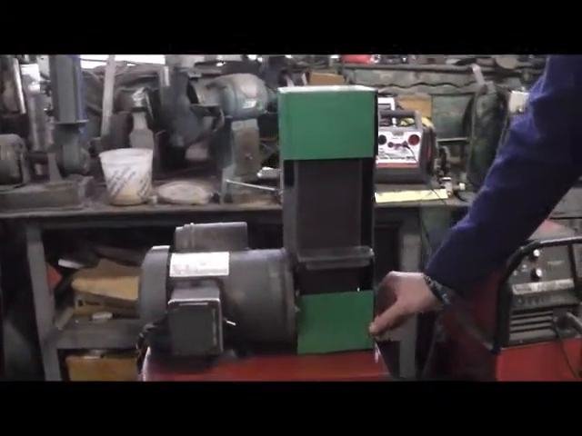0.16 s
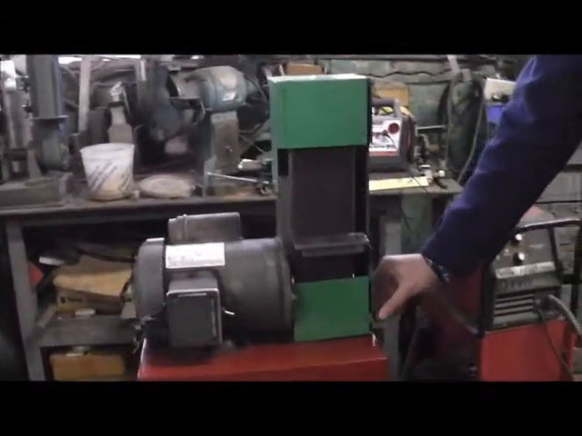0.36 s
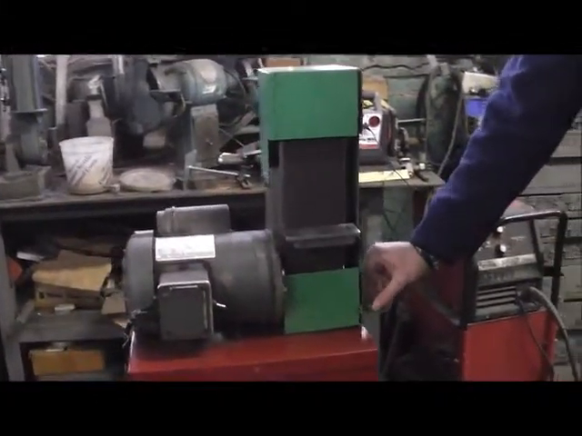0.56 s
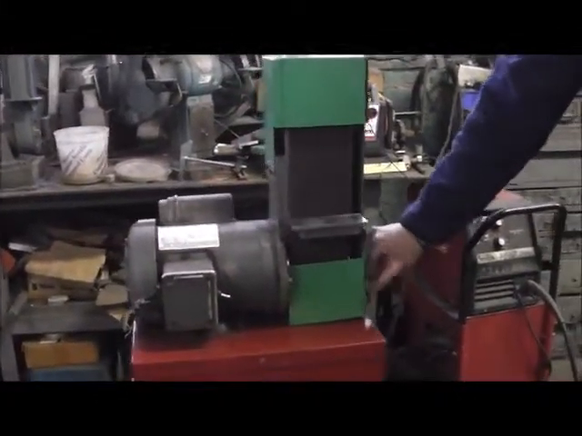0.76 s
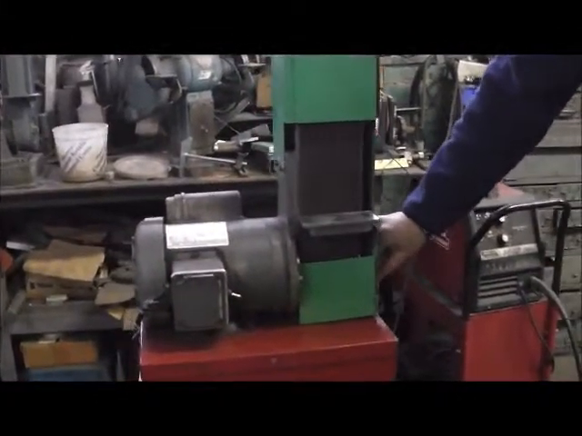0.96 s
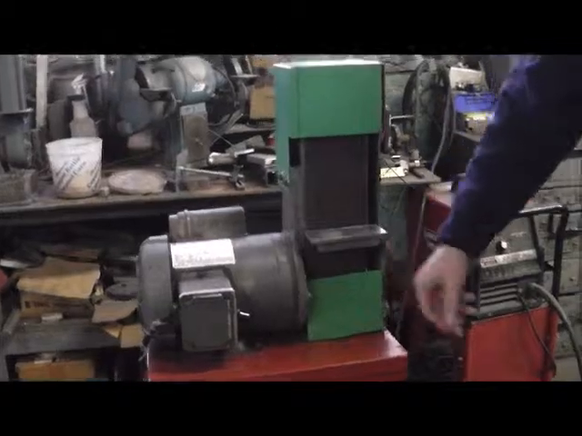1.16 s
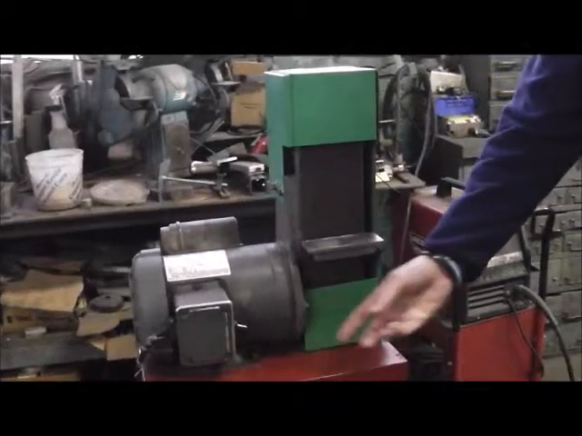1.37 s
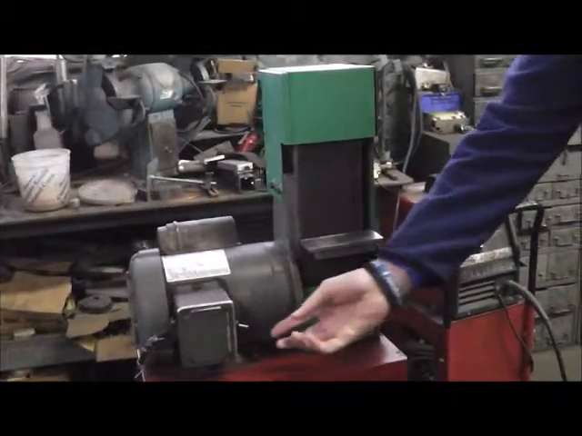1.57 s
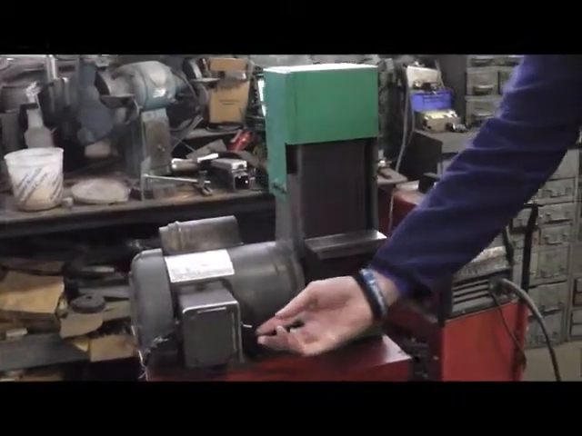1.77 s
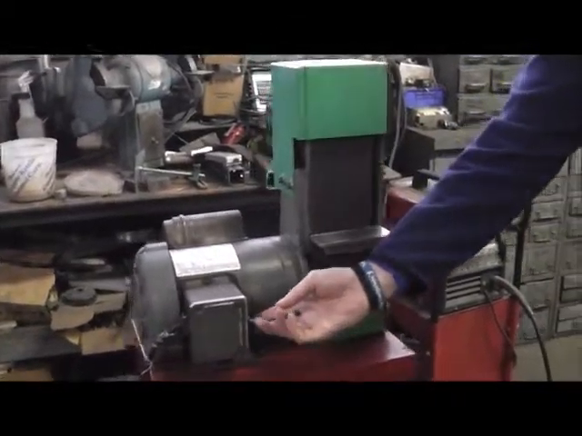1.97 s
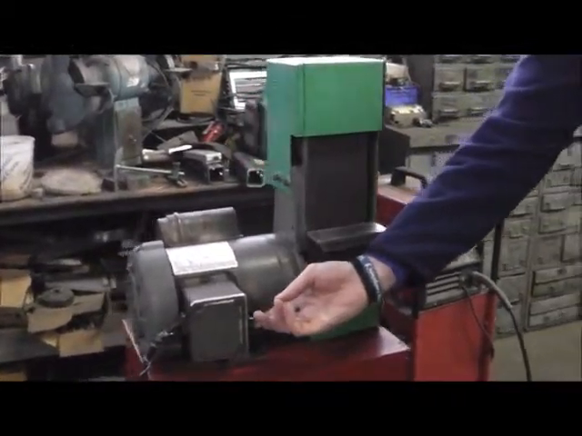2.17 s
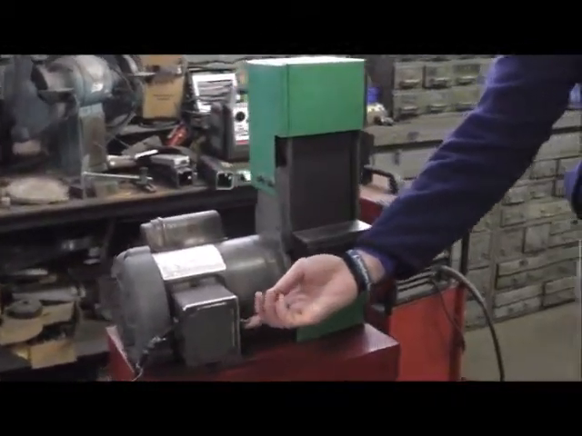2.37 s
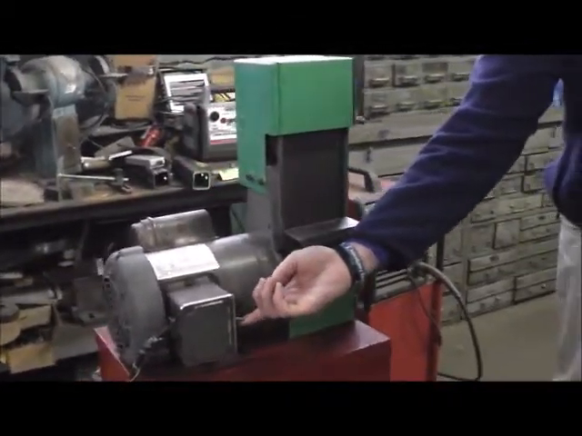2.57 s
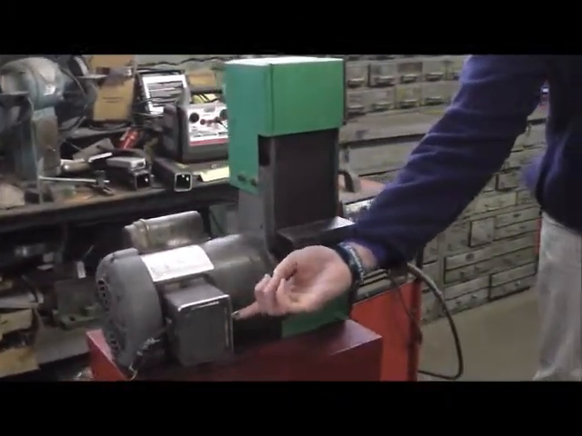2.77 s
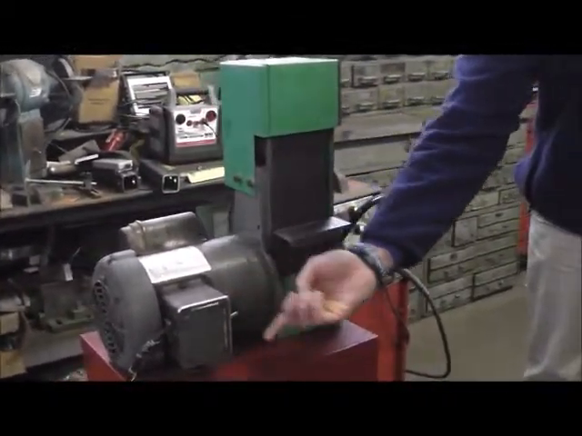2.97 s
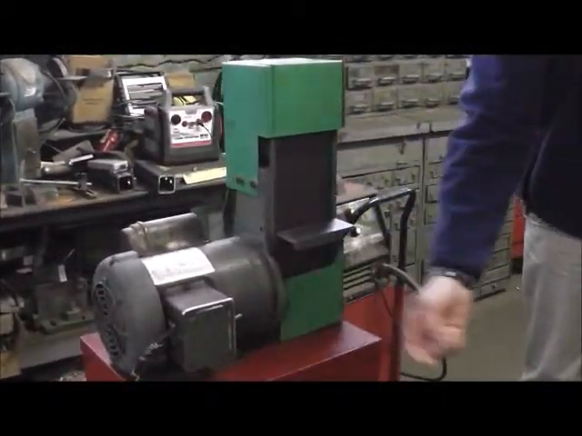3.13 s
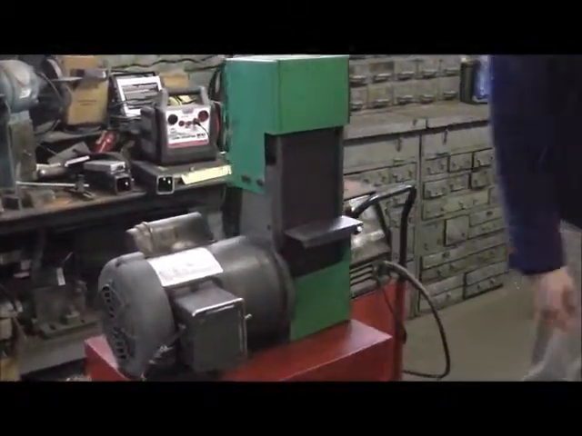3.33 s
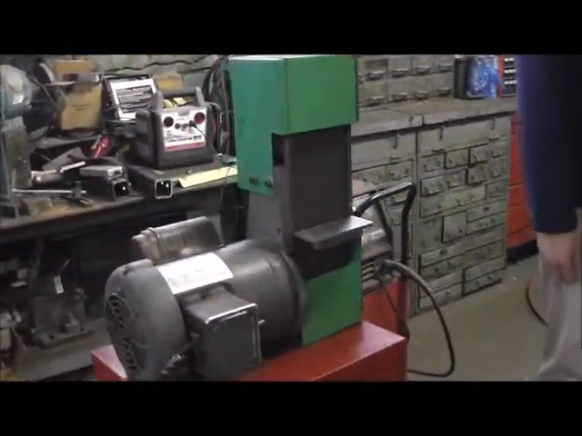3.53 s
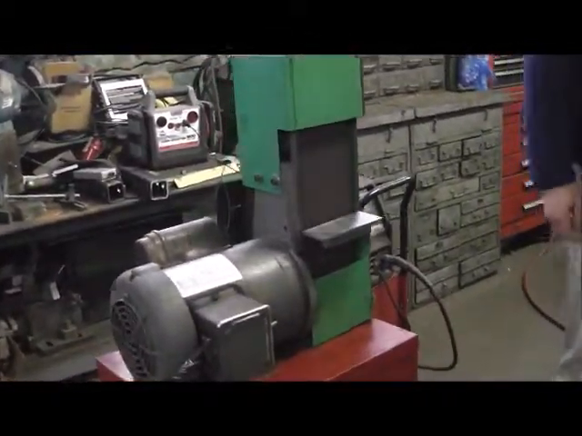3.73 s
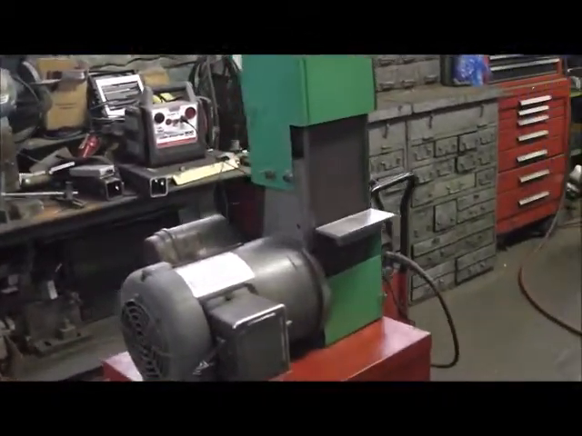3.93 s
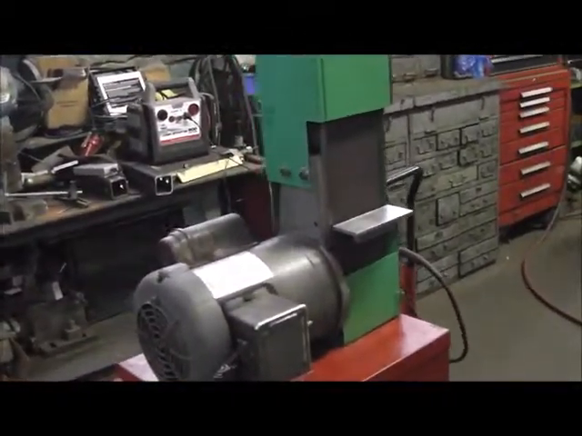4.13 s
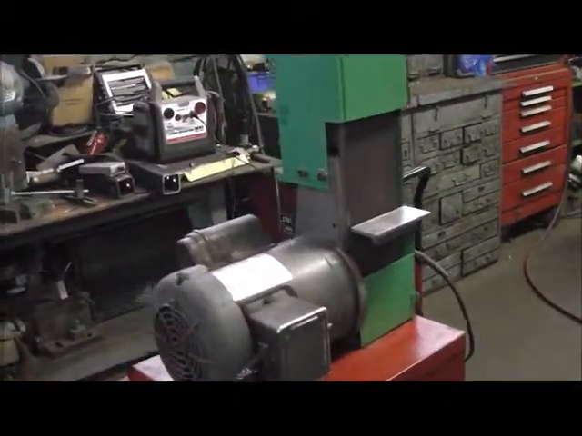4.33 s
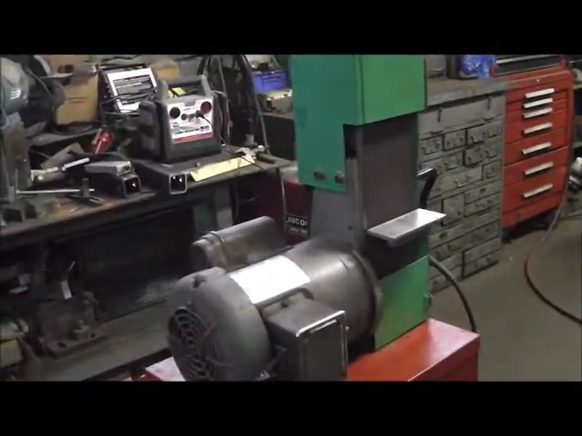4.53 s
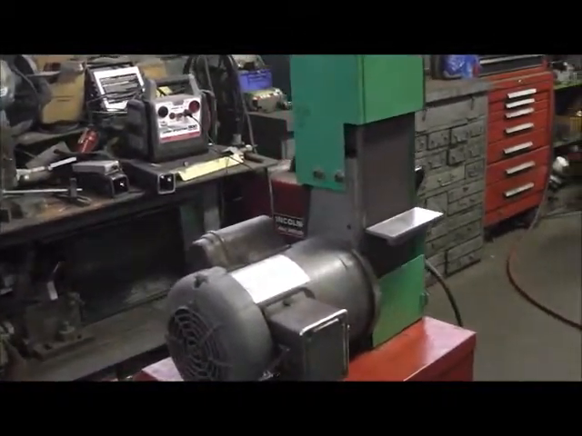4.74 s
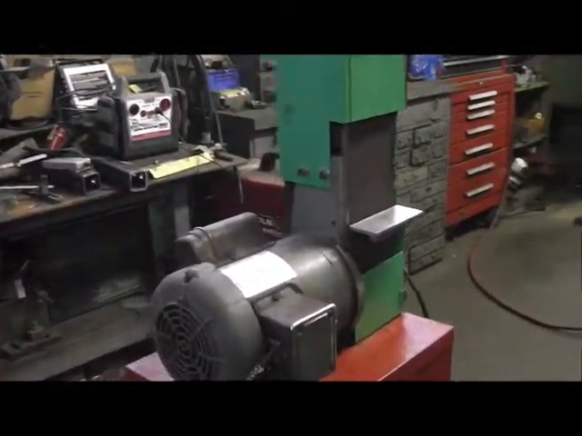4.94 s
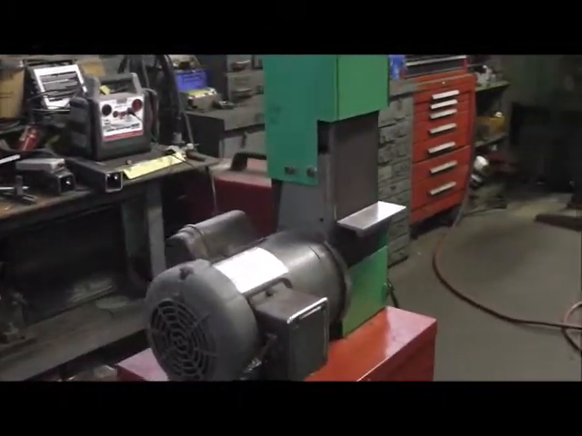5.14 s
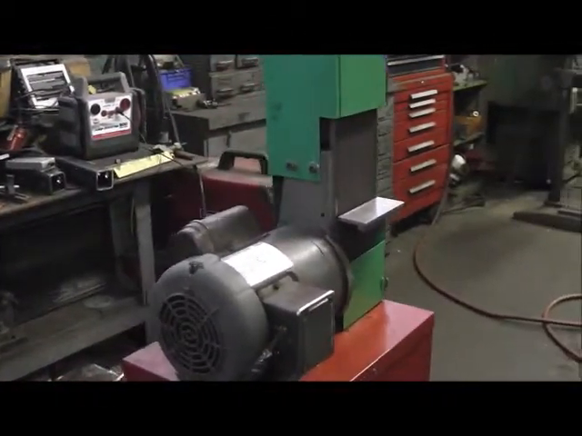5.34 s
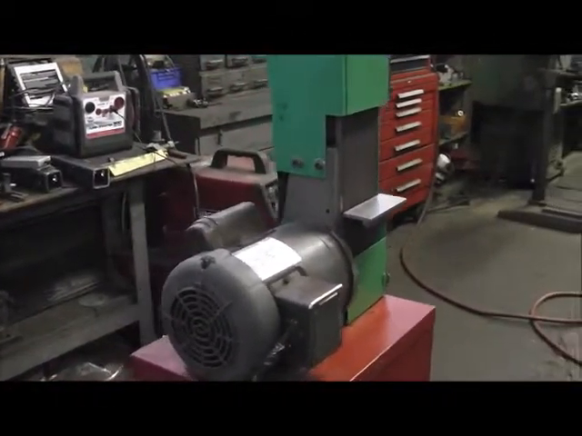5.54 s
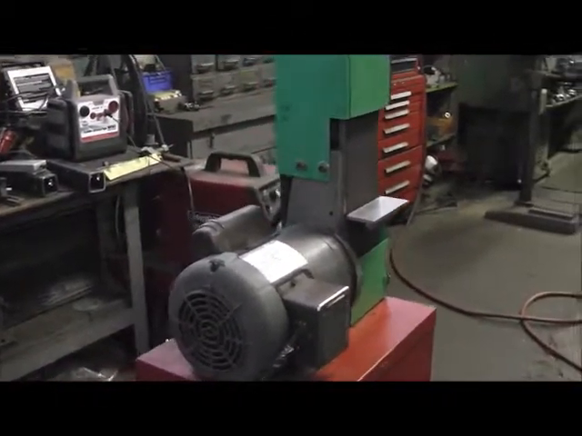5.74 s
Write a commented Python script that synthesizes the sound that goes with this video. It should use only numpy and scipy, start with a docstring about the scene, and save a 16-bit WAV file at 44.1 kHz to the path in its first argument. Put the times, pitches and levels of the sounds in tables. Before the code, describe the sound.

Metal clanks and light taps in a workshop, then a toggle switch snaps and a belt sander growls up to a loud, steady, roaring whine.

```python
"""In a machine shop, a bench belt sander starts up close to a hand-held camera. Metal parts clank, light taps
sound and feet scuff over a low rumble made of coloured noise, then a toggle switch snaps: bursts and rings.
The motor growls up to speed in about half a second and runs on with a humming shaft and a whining fan, all tones.
The belt is noise that partly repeats every lap: it roars over the rollers and hisses along the platen.
The camera's limiter turns everything down under the loudest sounds."""
import sys
import numpy as np
from scipy import signal
from scipy.fft import rfft, irfft, next_fast_len
from scipy.io import wavfile
from scipy.ndimage import uniform_filter1d, minimum_filter1d, map_coordinates

SR = 44100
rng = np.random.default_rng(int(sys.argv[2]) if len(sys.argv) > 2 else 0)


def wav_record(signal):
    """Record a signal, one row per channel, as 16-bit PCM in the file named by sys.argv[1]."""
    frames = np.transpose(np.atleast_2d(signal))
    bounded = np.clip(frames, -1, 1)
    # unit amplitude maps onto the largest positive 16-bit level
    quanta = np.round(bounded * 32767).astype(np.int16)
    wavfile.write(sys.argv[1], SR, quanta)


N = 255780
TIME = np.arange(N) / SR  # seconds

# Noise colours are scaled to rms 1 after shaping, so their levels only count relative to each other.
# Low rumble of the shop. Each row: frequency in Hz, level in dB.
RUMBLE_COLOUR = [(11, -30.5), (18, 0), (75, 1.5), (110, -5.5), (140, -12), (240, -120)]
# Handling of the camera. Each row: frequency in Hz, level in dB.
HANDLING_COLOUR = [(50, -34), (90, -6), (180, 1), (270, -5.5), (350, -14), (520, -37), (900, -76)]
# Steady moving air. Each row: frequency in Hz, level in dB.
AIR_COLOUR = [(150, 2), (350, 2), (650, 1.5), (1000, -5), (1500, -8.5), (2000, -16), (2700, -31),
              (3400, -30.5), (4500, -27.5), (7000, -32.5), (11000, -34), (15500, -43)]
# Scuffing shoes and sleeve. Each row: frequency in Hz, level in dB.
SCUFF_COLOUR = [(1800, 0), (3000, -16.5), (4200, -10.5), (5500, -3.5), (8500, -3), (11000, -6),
                (13000, -13.5), (16000, -15)]
# How the handling changes. Each row: time in seconds, rumble level in dB, rubbing level in dB.
HANDLING_LEVELS = [(0, -30, -40.5), (1.0, -31.5, -35.5), (1.85, -31, -28), (2.5, -26, -29),
                   (2.8, -34, -33.5), (3.6, -37, -39)]
# Scuffs. Each row: time of the peak in seconds, level in dB, rise by 60 dB in seconds, fall by 60 dB in seconds.
SCUFFS = [(.607, -45.5, 0.04, 0.34), (.7, -39, 0.78, .2), (1.61, -44, 0.25, 0.71), (2.035, -46, 0.03, .5),
          (2.087, -29.5, 0.0121, 0.13), (2.11, -38.5, 0.19, 0.47), (2.452, -48, 0.1, 0.43)]
# Colour of the echo, rich in the low middle. Each row: frequency in Hz, level in dB.
ECHO_COLOUR = [(100, -3), (320, 15.5), (450, -1), (680, 8), (1300, 2), (2500, 3), (8000, -1.5), (16000, -5)]
# How long the echo lasts. Each row: frequency in Hz, time to fall by 60 dB in seconds.
ECHO_DECAY = [(150, 0.72), (600, 0.865), (2000, 0.81), (5000, 0.794), (10000, 0.606), (16000, 0.3)]
# Stereo width of sounds from in front. Each row: frequency in Hz, side over middle in dB.
FRONT_WIDTH = [(30, -0.5), (200, -19.5), (2000, -26), (4000, -45.5), (7000, -13.5), (10000, -22),
               (12000, -1), (16000, -11)]
# Stereo width of sounds from all around. Each row: frequency in Hz, side over middle in dB.
AROUND_WIDTH = [(30, -15.5), (200, -22), (400, -18.5), (700, -16.5), (1300, -11), (2400, -12), (4400, -7.5),
                (8000, -7), (12000, -3), (16000, -1)]
# Light, dry taps. Each row: start in seconds, level in dB.
TAPS = [(1.502, -16.5), (1.5972, -14.5), (1.607, -24.5)]
# Colour of the taps and of the switch's knock. Each row: frequency in Hz, level in dB.
TAP_COLOUR = [(200, 3), (900, 5), (1500, 11.5), (2100, -5), (2800, -24.5), (4500, -21), (8000, -34.5),
              (15000, -36)]
# Metal contacts. Each row: start in seconds, bright clash level in dB, dull knock level in dB,
# steel ring level in dB, time for the clash to fall by 60 dB in seconds.
CLANKS = [(.1168, -9, -24.5, -15, 0.0853), (.133, -31, -19.5, -28.5, .06), (.413, -25, -23, -32.5, 0.0505),
          (.699, -48, -28, -59.5, .08), (0.8775, -43.5, -32, -58.5, 0.076),
          (.894, -5.5, -15.5, -28.5, 0.054), (.899, -8, -16.5, -24, 0.053),
          (.909, -12, -12.5, -43.5, 0.033), (.914, -4.5, -12, -36.5, 0.026),
          (1.026, -25.5, -50.5, -64, .04)]
# Colour of a bright clash and of the switch's crack. Each row: frequency in Hz, level in dB.
CLASH_COLOUR = [(300, -17), (2000, -23.5), (3000, -16), (4500, -6), (7000, -0.5), (10500, 5.5), (13000, -3),
                (16000, -15.5)]
# Colour of a dull knock. Each row: frequency in Hz, level in dB.
KNOCK_COLOUR = [(100, -24), (320, -0.5), (400, -6.5), (510, -1), (680, -0.5), (1000, -9), (1300, -1.5),
                (2000, -10.5), (2700, -29.5), (4500, -15.5), (8000, -30.5)]
# Ringing tones of the steel. Each row: frequency in Hz, typical level in dB, time to fall by 60 dB in seconds.
STEEL_TONES = [(832, -10, 0.248), (1280, -7.5, 0.104), (1762, -12, 0.145), (1993, -7.5, 0.0575),
               (4960, -4.5, 0.047), (5010, -2.5, 0.051), (5200, -7.5, 0.048), (9500, -14, .07),
               (10330, -21, .08)]
# The toggle snaps over, then its contacts close. Each row: start in seconds, level in dB.
SNAPS = [(2.7856, -9), (2.7877, -3)]
# Ringing tones of the switch box. Each row: frequency in Hz, typical level in dB, time to fall by 60 dB in seconds.
SWITCH_BOX_TONES = [(1420, -4, 0.025), (1570, -11.5, 0.0206), (2047, -4, 0.027), (2250, -6.5, 0.029),
                    (8970, -14, 0.0123), (9130, 1, 0.012), (14350, -1, 0.0094)]
# Tones of the frame during the start. Each row: frequency in Hz, level in dB relative to the growl.
GROWL_TONES = [(255, -2.5), (520, 1), (770, -12), (1250, -13)]
# Tones of the turning shaft. Each row: cycles per turn, typical level in dB before SANDER_DB.
SHAFT_TONES = [(1, -43.5), (3, -44), (9, -43.5), (10, -39.5)]
# Standing waves of the hum. Each row: time in seconds, level of the 2-per-turn tone in dB,
# shared level of the 4- and 5-per-turn tones in dB (before their own gains, the wobble and SANDER_DB).
HUM_LEVELS = [(3.25, -42.5, -34), (3.41, -27, -33.5), (3.67, -48.5, -35), (4.26, -29.5, -24),
              (4.65, -44.5, -26.5), (4.71, -39.5, -23.5), (5.3, -48.5, -36.5), (5.64, -27.5, -23),
              (5.8, -32, -24)]
# Standing waves of the fan, as the camera moves through them. Each row: time in seconds,
# blade tone level in dB, level of its octave in dB (before the flutter, the speed, the octave's gain and SANDER_DB).
FAN_LEVELS = [(3.26, -17, -19), (3.34, -17, -16.5), (3.95, -21, -16.5), (3.97, -17.5, -16.5),
              (4.39, -21.5, -18.5), (4.43, -15, -18.5), (4.49, -23.5, -18.5), (4.66, -18.5, -18.5),
              (4.76, -23, -21), (4.88, -20, -20.5), (5.41, -21, -18), (5.8, -16.5, -20.5)]
# The camera moves round the belt. Each row: time in seconds, change of level in dB.
BELT_NEARNESS = [(3.1, 1.94), (3.5, -0.13), (4.0, 0.78), (4.5, -2), (5.0, -2), (5.45, -0.16), (5.8, 0.05)]
# Colour of the rollers' roar. Each row: frequency in Hz, level in dB.
ROAR_COLOUR = [(30, -26.5), (150, -15), (260, -3.5), (370, -6.5), (480, -0.5), (720, 1.5), (900, -2),
               (1250, -1.5), (1550, -2.5), (1950, -5), (2250, -15), (2600, -21), (3300, -39.5), (5000, -68)]
# Colour of the platen's hiss. Each row: frequency in Hz, level in dB.
HISS_COLOUR = [(1650, -58.5), (2800, -9.5), (3240, -12.5), (3720, -9), (4060, -3.5), (6020, -5), (7390, -1),
               (10600, 1.5), (11200, -1), (13100, -9.5), (15200, -14), (16000, -13.5)]
# Difference between the two microphones. Each row: frequency in Hz, left over right in dB.
MICROPHONE_BALANCE = [(40, 0), (110, 1), (1300, 1.52), (2400, -0.83), (4400, -1), (8500, -0.14),
                      (10000, -3), (11500, -6), (12700, -2.5), (13800, 2.5), (16000, 2)]

SHAFT_HZ, LAP_HZ = 59.43, 20.425  # turns and belt laps per second at full speed
TOP_HZ = 15900  # nothing is heard above this
START_S, RUN_UP_S = 2.79, .465  # the motor's start and how long it takes to reach full speed
SLUGGISH = .2  # how far the speed lags early in the run-up
SANDER_DB = 3.5  # boost of the whole machine, on top of its parts' levels
ROAR_DB, HISS_DB = -16, -20  # typical belt levels at full speed, before SANDER_DB
ROAR_GROWS, HISS_GROWS = 0.69, 0.955  # their amplitudes rise as these powers of the speed
TAUT_S, SLACK_DB = 3.004, -3  # the belt is quieter until it pulls taut against the platen
GROWL_DB = -24.5  # the starting winding's growl, before the throb and SANDER_DB
GROWL_ATTACK_S, GROWL_HOLD_S, GROWL_RELEASE_S = 0.162, 0.061, 0.194
THROB_HZ, THROB_DB, THROB_AT_S = 17.95, 5, 2.933  # the growl's throb: rate, swing, time of one crest
AIR_DB = -30.5
CEILING_DB, SQUEEZE, RECOVER_DB_PER_S = -2.5, 0.795, 56  # limiter: threshold, share of excess removed, release


def amp(db):
    """Turn decibels into a gain."""
    return 10 ** (np.asarray(db) / 20)


def unit(x):
    """Scale a sound to rms 1."""
    return x / np.sqrt(np.mean(x ** 2) + 1e-20)


def along(points, hz):
    """Read between (Hz, value) points on a log frequency axis."""
    point_hz, value = np.transpose(points)
    return np.interp(np.log(hz + 1), np.log(point_hz + 1), value)


def curves(rows):
    """Draw one curve over time for each column after the time."""
    s, *columns = np.transpose(rows)
    return [np.interp(TIME, s, column) for column in columns]


def wobble(rate):
    """Make a smooth random curve through `rate` random points a second."""
    points = rng.standard_normal(int(N * rate / SR) + 4)
    return map_coordinates(points, [TIME * rate])


def filtered(x, response):
    """Change the strength of each frequency in a sound."""
    n = x.shape[-1]
    m = next_fast_len(n + 8192)
    hz = np.fft.rfftfreq(m, 1 / SR)
    return irfft(rfft(x, m) * response(hz), m)[..., :n]


def colour(pair, spectrum, width):
    """Turn two white signals into left and right of rms 1; `width` sets how much they differ."""
    def middle_and_side(hz):
        return amp(along(spectrum, hz)) * [np.ones(len(hz)), amp(along(width, hz))]

    mid, side = filtered(pair, middle_and_side)
    return unit(np.array([mid + side, mid - side]))


def noise(spectrum, width=AROUND_WIDTH, size=N):
    """Make coloured stereo noise of rms 1."""
    return colour(rng.standard_normal((2, size)), spectrum, width)


def tone(cycles):
    """Make a sine of rms 1 with a random starting phase."""
    return np.sqrt(2) * np.sin(2 * np.pi * (cycles + rng.random()))


def fade(t, t60):
    """Die away by 60 dB in t60 seconds."""
    return np.exp(-np.log(1000) * t / t60)


def swell(s, rise, fall):
    """Peak at time s; rise and fall each span 60 dB in the given seconds."""
    before, after = np.maximum(s - TIME, 0), np.maximum(TIME - s, 0)
    return fade(before, rise) * fade(after, fall)


def ring(modes, t):
    """Ring a struck object as fading sines, with new random strengths for each blow."""
    return sum(amp(db + rng.normal(0, 1.0)) * fade(t, t60) * tone(hz * t) for hz, db, t60 in modes)


def add(track, s, sound):
    """Mix a sound into the track at time s."""
    track[:, round(s * SR):][:, :sound.shape[-1]] += sound


def shop():
    """Low rumble, camera handling, moving air and scuffs are noises; all but the air change in level."""
    rumble_db, rubbing_db = curves(HANDLING_LEVELS)
    rumble = amp(rumble_db + 1.8 * wobble(9)) * noise(RUMBLE_COLOUR)
    handling = amp(rubbing_db + 1.25 * wobble(8)) * noise(HANDLING_COLOUR)
    air = amp(AIR_DB) * noise(AIR_COLOUR)
    strokes = sum(amp(db) * swell(s, rise, fall) for s, db, rise, fall in SCUFFS)
    roughness = amp(1.77 * wobble(120))
    scuffs = strokes * roughness * noise(SCUFF_COLOUR)
    return rumble + handling + air + scuffs


def room(x):
    """The shop's echo is a tail of noise in which each frequency dies at its own speed."""
    hz, t, grains = signal.stft(noise(ECHO_COLOUR, size=SR), SR, nperseg=256)
    decay = fade(t, along(ECHO_DECAY, hz)[:, None])
    build_up = 1 - np.exp(-t / 0.0027)
    tail = signal.istft(grains * decay * build_up, SR, nperseg=256)[1]
    tail = tail / np.linalg.norm(tail[0])
    mono = x.mean(axis=0)[None]
    return signal.fftconvolve(mono, tail, axes=1)[:, :N]


def taps():
    """Dry taps are short bursts of noise that die within a few cycles."""
    track, t = np.zeros((2, N)), np.arange(SR // 10) / SR
    for s, db in TAPS:
        add(track, s, amp(db) * fade(t, 0.0226) * noise(TAP_COLOUR, size=len(t)))
    return track


def clanks():
    """Each metal contact is a bright clash, a dull knock and a short steel ring."""
    track, t = np.zeros((2, N)), np.arange(SR // 2) / SR
    for s, clash_db, knock_db, ring_db, t60 in CLANKS:
        clash = amp(clash_db) * fade(t, t60) * noise(CLASH_COLOUR, FRONT_WIDTH, size=len(t))
        knock = amp(knock_db) * fade(t, 0.1022) * noise(KNOCK_COLOUR, FRONT_WIDTH, size=len(t))
        steel = amp(ring_db) * ring(STEEL_TONES, t)
        add(track, s, clash + knock + steel)
    return track


def switch():
    """The toggle cracks, knocks and rings its small steel box."""
    track, t = np.zeros((2, N)), np.arange(SR // 4) / SR
    for s, db in SNAPS:
        crack = amp(0.5) * fade(t, 0.0208) * noise(CLASH_COLOUR, FRONT_WIDTH, size=len(t))
        knock = amp(-10.5) * fade(t, 0.093) * noise(TAP_COLOUR, FRONT_WIDTH, size=len(t))
        box = amp(-7) * ring(SWITCH_BOX_TONES, t)
        add(track, s, amp(db) * (crack + knock + box))
    return track


def run_up():
    """Share of full speed: the motor starts sluggishly, pulls hardest past halfway, then eases in."""
    u = np.clip((TIME - START_S) / RUN_UP_S, 0, 1)
    return u + u * (1 - u) * (u ** 3 - SLUGGISH * (1 - u))


def starting_growl():
    """Current in the starting winding makes the frame growl in rough tones that throb together."""
    corners = START_S + np.cumsum([0, GROWL_ATTACK_S, GROWL_HOLD_S, GROWL_RELEASE_S])
    inrush = np.interp(TIME, corners, [0, 1, 1, 0])
    throb_db = THROB_DB * np.cos(2 * np.pi * THROB_HZ * (TIME - THROB_AT_S))
    tones = sum(amp(db) * tone(hz * TIME + 0.17 * wobble(45)) for hz, db in GROWL_TONES)
    return inrush * amp(GROWL_DB + throb_db) * tones


def motor(speed, travel):
    """Under the starting growl, the tones of the turning shaft and the hum rise steeply with speed, then run on."""
    turns = SHAFT_HZ * travel
    # the shaft's unbalance shakes the stand
    shaft = sum(amp(db + 1.9 * wobble(2.895)) * tone(order * turns + 0.052 * wobble(3.97))
                for order, db in SHAFT_TONES)

    def hum_tone(order):
        return amp(1.06 * wobble(8)) * tone(order * turns + 0.139 * wobble(9))

    low_db, high_db = curves(HUM_LEVELS)
    low_hum = amp(low_db) * hum_tone(2)
    high_hum = amp(high_db) * (0.586 * hum_tone(4) + 0.547 * hum_tone(5))
    return starting_growl() + speed ** 4 * (shaft + low_hum + high_hum)


def fan(speed, travel, blades=11):
    """The cooling fan's blade tone and its overtones flutter in the turbulent air."""
    first_db, second_db = curves(FAN_LEVELS)
    passes = blades * SHAFT_HZ * travel
    first = amp(first_db + .7 * wobble(25)) * tone(passes + .012 * wobble(20))
    second = amp(second_db + 0.85 * wobble(24.953)) * tone(2 * passes + 0.014 * wobble(9.1))
    third = amp(-33 + 1.5 * wobble(4)) * tone(3 * passes)
    airborne = np.clip((speed - .66) / .1, 0, 1)  # silent below 66% of full speed
    # the overtones grow more steeply with speed than the blade tone
    return airborne * (speed * first + speed ** 4 * (1.098 * second + third))


def zing(speed, travel, full_hz, loudest_hz, db, width, fuzz_rate):
    """The belt's texture sings a fuzzy rising note, loud as it sweeps through a resonance of the frame."""
    now_hz = full_hz * speed
    offset = (now_hz - loudest_hz) / (width * loudest_hz)
    resonance = 1 / (1 + offset ** 2)
    angle = 2 * np.pi * full_hz * travel
    fuzzy_note = unit(wobble(fuzz_rate) * np.sin(angle) + wobble(fuzz_rate) * np.cos(angle))
    audible = (speed > 0) * np.clip((TOP_HZ - now_hz) / 1000, 0, 1)
    return amp(db) * fuzzy_note * audible * resonance


def belt_noise(laps, speed, spectrum, repeat):
    """The same stretch of grit gives the same noise every lap; the rest of the noise is fresh."""
    size = int(SR / LAP_HZ)
    place = (laps % 1) * size
    grit = rng.standard_normal((2, size))
    surface = np.array([map_coordinates(row, [place], mode="grid-wrap") for row in grit])
    share = repeat * speed ** 4  # repeating part of the power
    fresh = rng.standard_normal((2, N))
    return colour(np.sqrt(share) * surface + np.sqrt(1 - share) * fresh, spectrum, FRONT_WIDTH)


def belt(speed, travel):
    """Roar of the rollers and hiss of the platen grow with speed and swell mainly twice a lap as the belt flaps."""
    near_db, = curves(BELT_NEARNESS)
    laps = LAP_HZ * travel + 0.000428 * wobble(2.0086)  # the belt creeps a little on its rollers
    flap = tone(2 * laps) + .6 * (tone(laps) + tone(4 * laps) + tone(6 * laps))
    roar_db = ROAR_DB + near_db + .5 * flap + 0.69 * wobble(16)
    hiss_db = HISS_DB + near_db + 0.672 * flap + 0.4 * wobble(14)
    roar = amp(roar_db) * belt_noise(laps, speed, ROAR_COLOUR, repeat=0.336)
    hiss = amp(hiss_db) * belt_noise(laps, speed, HISS_COLOUR, repeat=0.443)
    dull = filtered(roar, lambda hz: 1 / (1 + (hz / 900) ** 2))
    blended_roar = speed * roar + (1 - speed) * dull  # a slow belt roars duller
    taut = amp(np.interp(TIME - TAUT_S, [0, .01], [SLACK_DB, 0]))
    return taut * (speed ** ROAR_GROWS * blended_roar + speed ** HISS_GROWS * hiss)


def sander():
    """The motor's speed drives the shaft, the fan and the belt; the starting growl keeps its own timing."""
    speed = run_up()
    travel = np.cumsum(speed) / SR  # the same distance as this many seconds at full speed
    weave = zing(speed, travel, full_hz=3996, loudest_hz=2110, db=-25.0, width=0.223, fuzz_rate=400)
    grit = zing(speed, travel, full_hz=25000, loudest_hz=9200, db=-33, width=.16, fuzz_rate=1400)
    machine = motor(speed, travel) + fan(speed, travel) + weave + grit + belt(speed, travel)
    return amp(SANDER_DB) * machine


def scene():
    """Add the shop, the taps, the metal and the switch with their echo, and the sander."""
    metal, snap = clanks(), switch()
    echo = room(amp(-10.5) * metal + amp(-12) * snap)
    return shop() + echo + taps() + metal + snap + sander()


def limiter(x):
    """Peaks over the ceiling turn the gain down almost at once; it recovers at a steady rate."""
    peak_db = 20 * np.log10(np.abs(x).max(axis=0) + 1e-9)
    excess_db = SQUEEZE * np.maximum(peak_db - CEILING_DB, 0)
    recovery_db = RECOVER_DB_PER_S * TIME
    cut_db = np.maximum.accumulate(excess_db + recovery_db) - recovery_db
    held_db = minimum_filter1d(-cut_db, size=44)  # 44 samples are 1 ms
    return x * amp(uniform_filter1d(held_db, size=44))


def record(dry):
    """The two microphones differ a little in colour; the camera limits, clips and cuts the top."""
    def microphones(hz):
        balance_db = along(MICROPHONE_BALANCE, hz)
        return amp(np.array([balance_db, -balance_db]) / 2)

    limited = limiter(filtered(dry, microphones))
    return filtered(np.clip(limited, -1, 1), lambda hz: hz < TOP_HZ)


dry = scene()
out = record(dry)
wav_record(out)
```